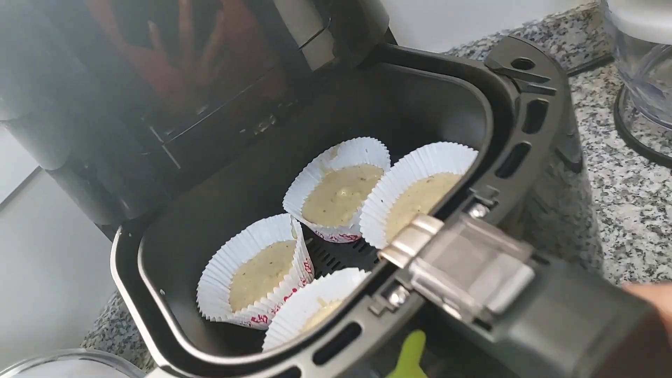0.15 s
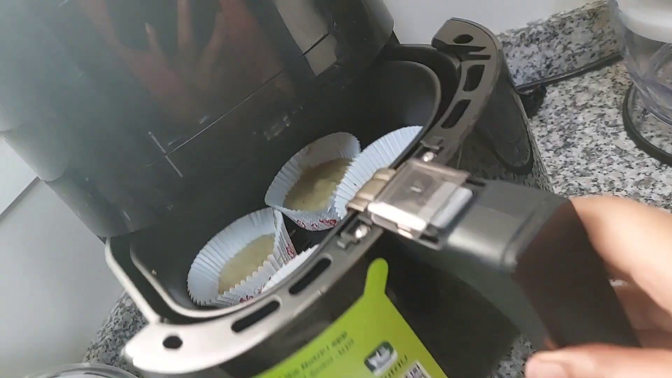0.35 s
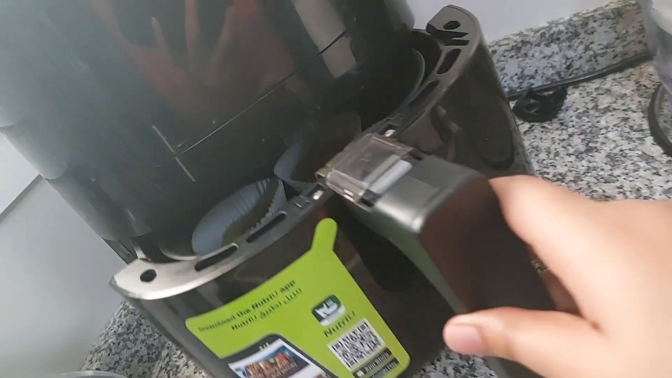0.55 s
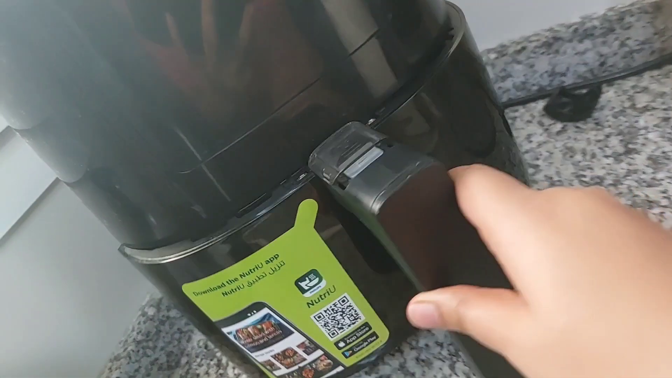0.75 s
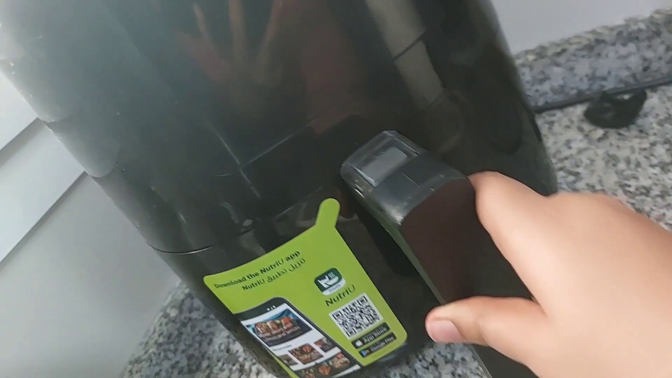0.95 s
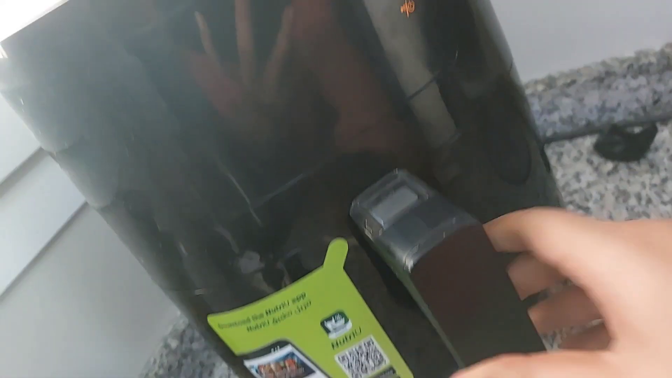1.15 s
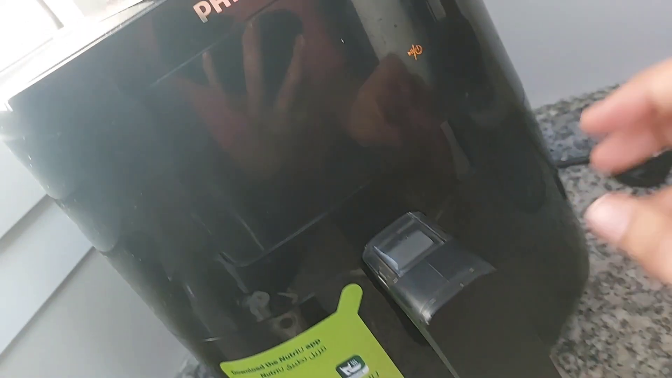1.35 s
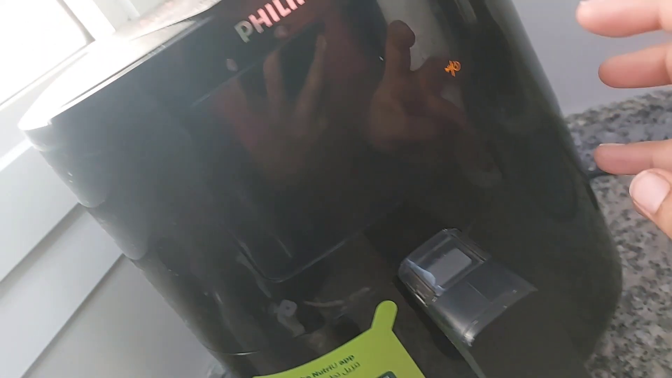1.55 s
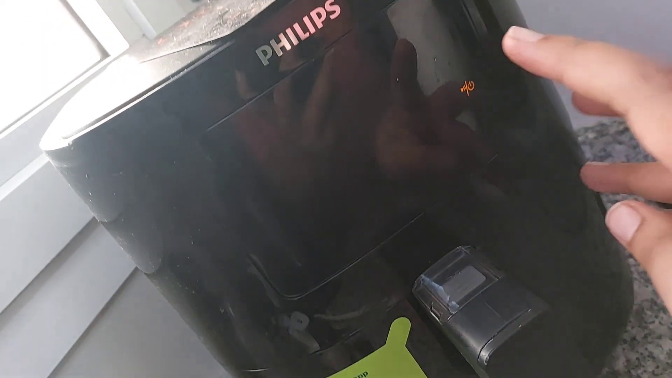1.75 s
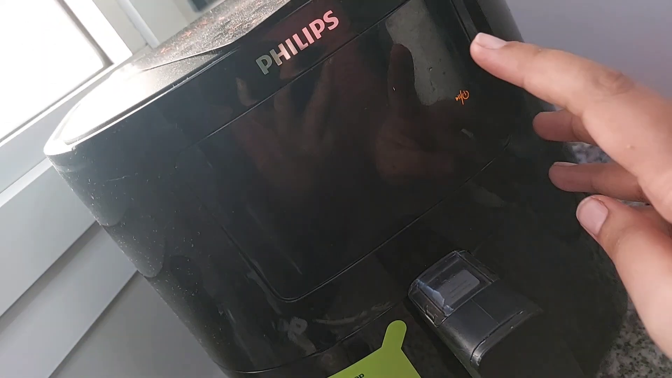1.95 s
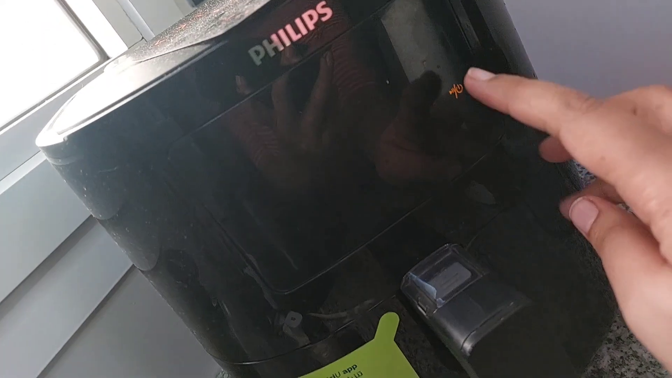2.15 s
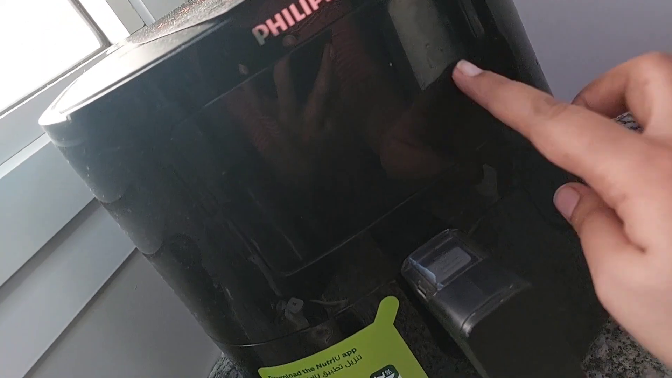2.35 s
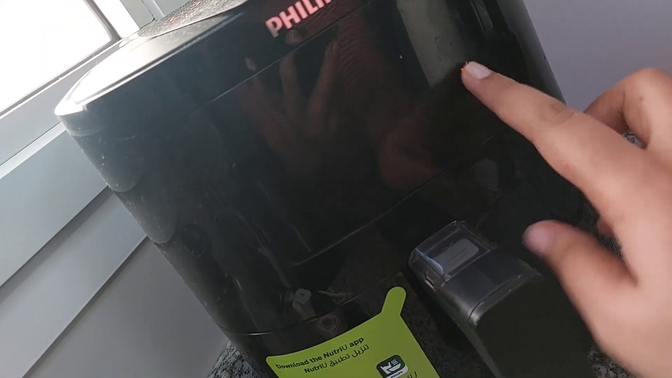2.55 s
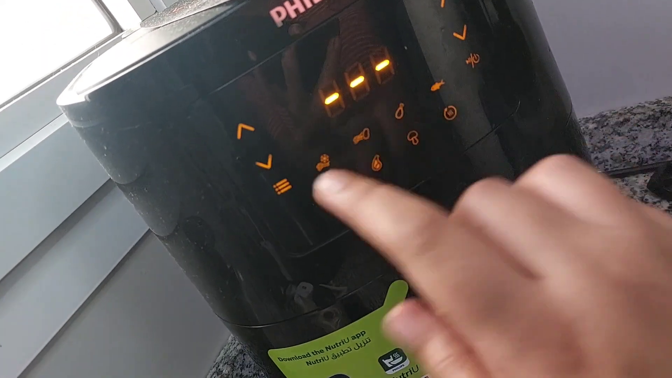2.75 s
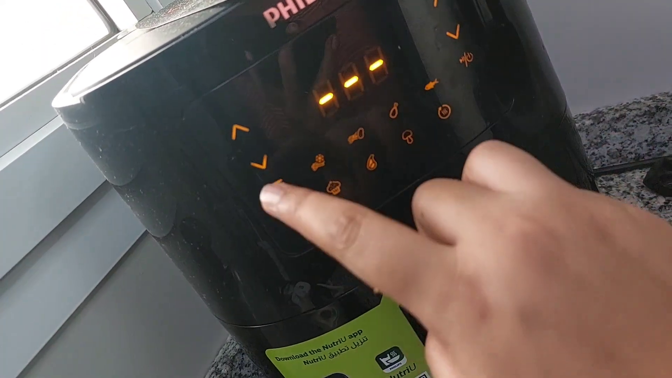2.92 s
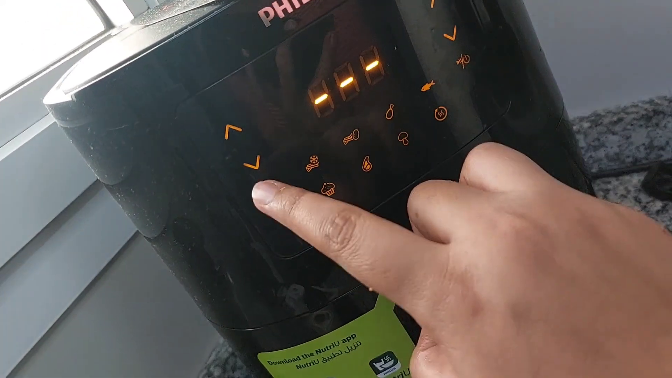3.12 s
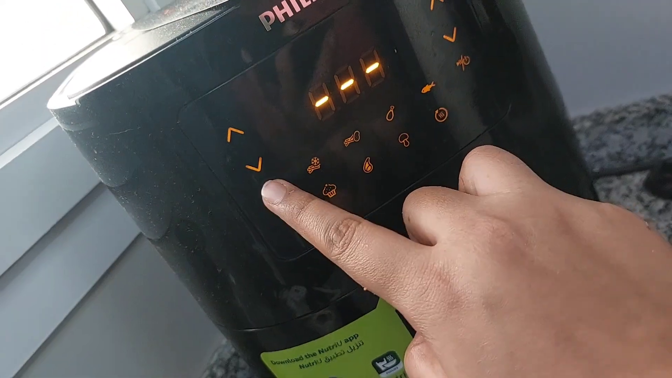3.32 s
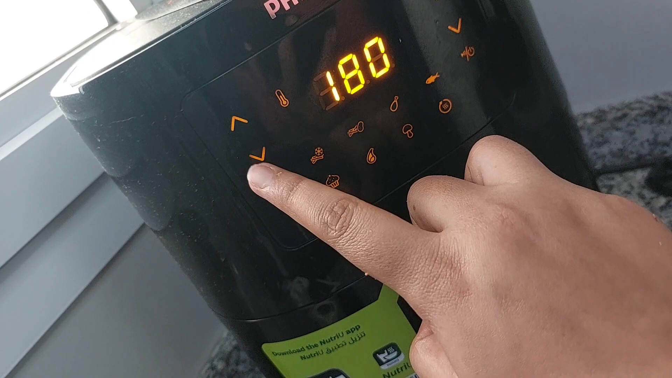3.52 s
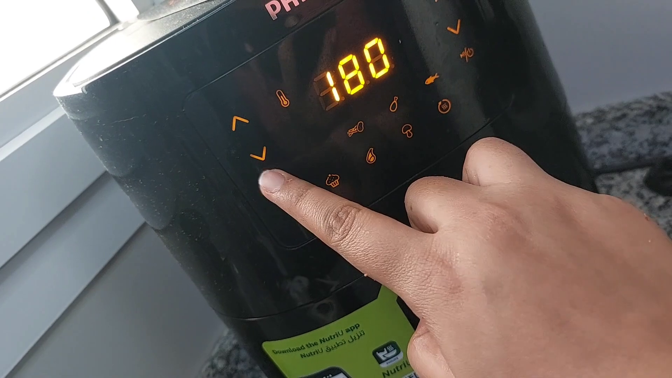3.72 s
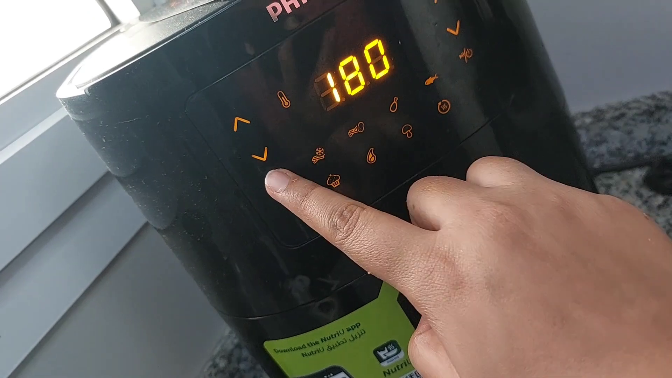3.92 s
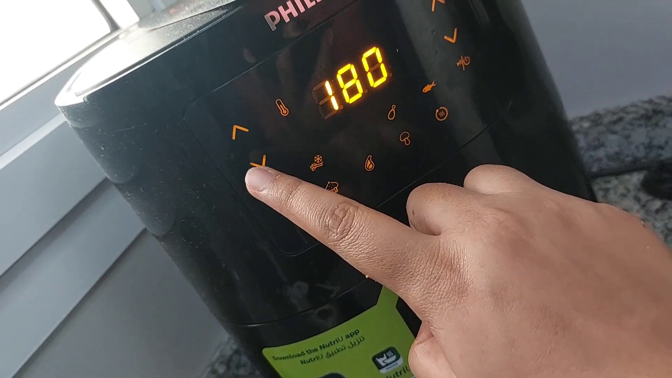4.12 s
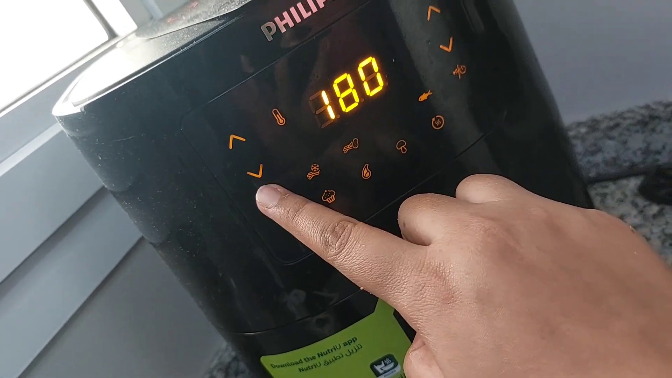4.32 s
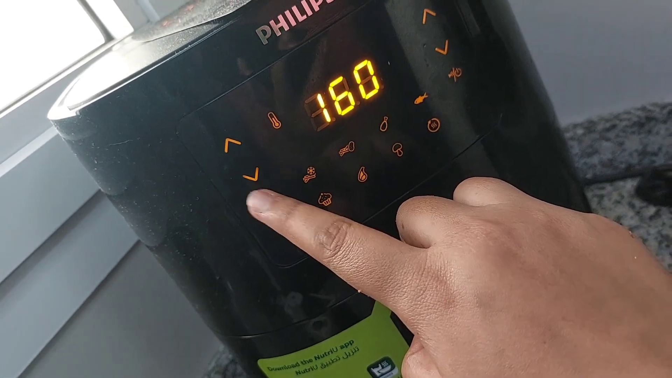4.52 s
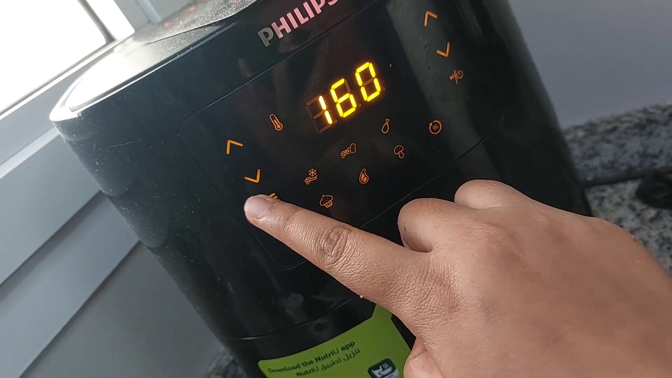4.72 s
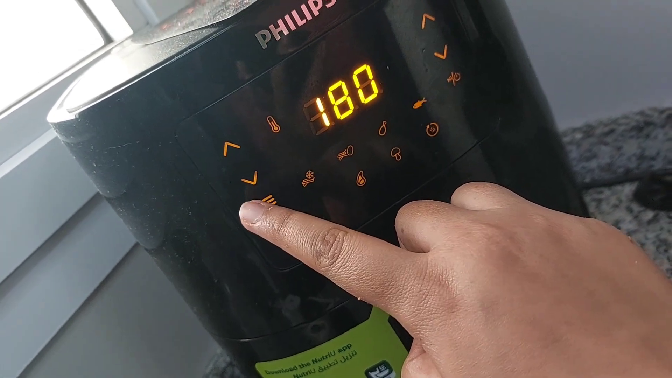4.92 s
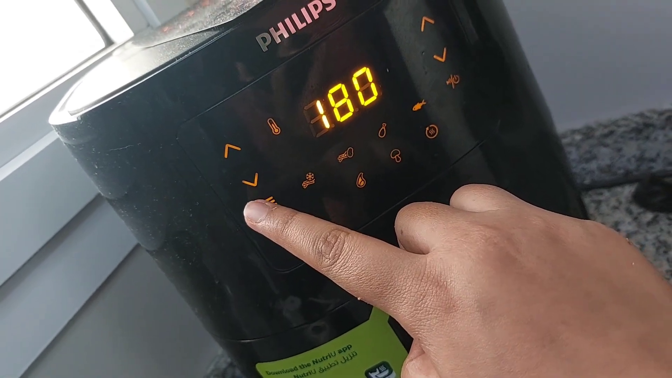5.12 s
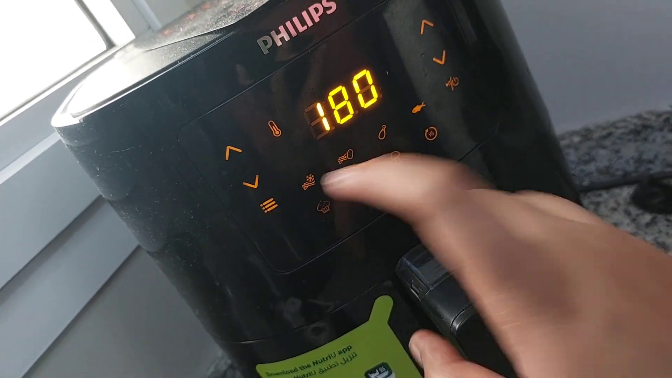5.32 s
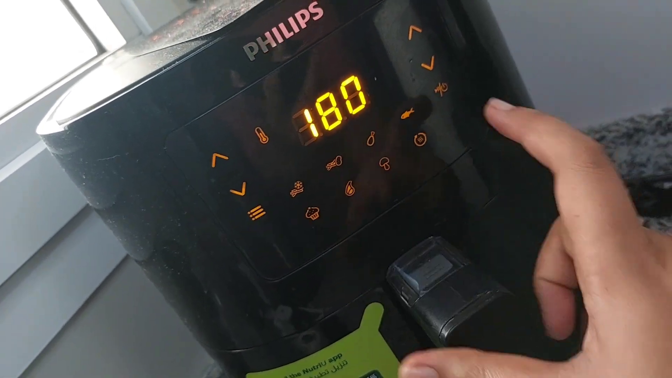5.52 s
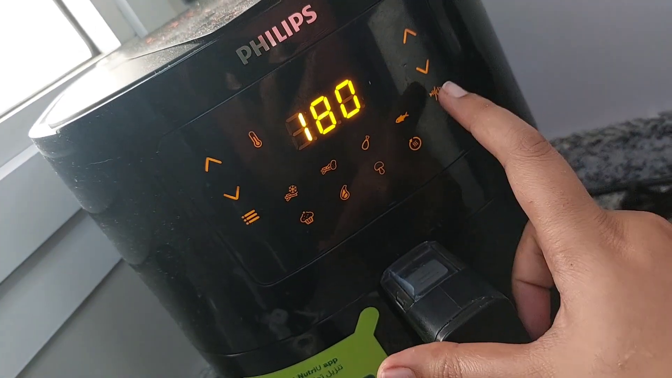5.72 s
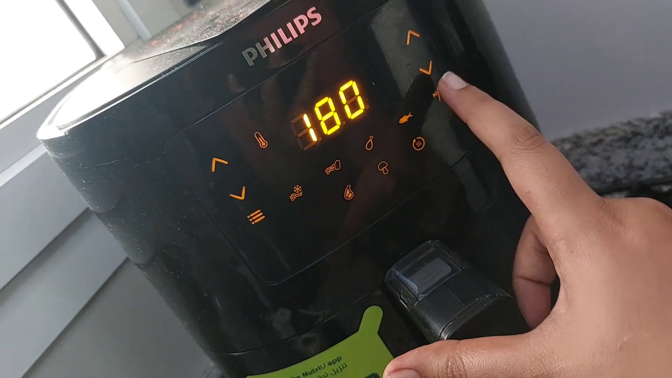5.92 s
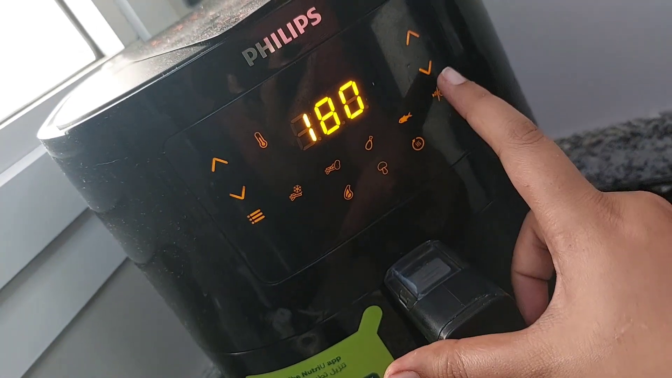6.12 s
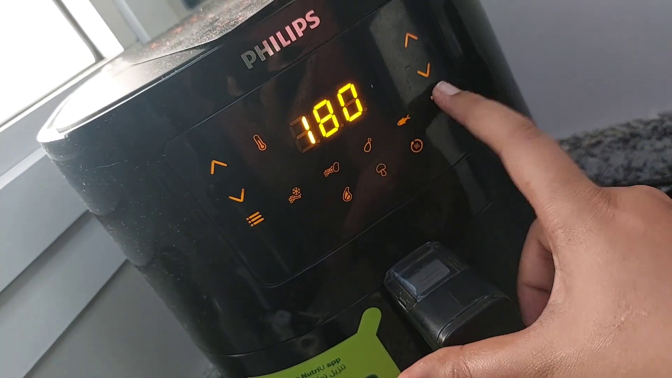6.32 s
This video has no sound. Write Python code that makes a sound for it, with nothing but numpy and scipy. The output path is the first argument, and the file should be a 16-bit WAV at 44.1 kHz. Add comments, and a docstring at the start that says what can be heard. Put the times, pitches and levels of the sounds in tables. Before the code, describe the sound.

Scraping, knocking appliance drawer bangs shut within the first second or so, leaving a wavering mains hum, small handling ticks and a very faint distant horn.

```python
"""Fryer drawer shutting in a kitchen

The basket drawer of a counter-top fryer slides in, knocks on its guides, rattles and latches shut: grains
of rubbing and short blows ring its modes, over hissing rails. A mains hum of wavering sines and a rumble of
banded noise lie below; later a hand ticks and rustles close to the microphone and a far two-tone horn sounds.
The recorder lowers its gain on the loud knocks, holds it and lets it come back."""
import sys
import numpy as np
from scipy import signal
from scipy.fft import rfft, irfft, next_fast_len
from scipy.io import wavfile

SR = 44100
rng = np.random.default_rng(int(sys.argv[2]) if len(sys.argv) > 2 else 0)


def dump(signal):
    """Clip the signal to [-1, 1] and save it as 16-bit WAV at the path in sys.argv[1]."""
    limited = np.clip(np.atleast_2d(signal).T, -1, 1)
    pcm = np.round(limited * 32767).astype(np.int16)
    wavfile.write(sys.argv[1], SR, pcm)


N = 280476  # samples
TOP_HZ = SR / 2.2  # highest band edge


def from_db(db):
    """Gain of a level in dB."""
    return 10 ** (np.asarray(db) / 20)


def rms_one(x):
    """Scaled to rms 1."""
    return x / np.sqrt(np.mean(x ** 2) + 1e-20)


def in_time(rows):
    """Curve columns in dB at every sample; silent outside the table."""
    s, *columns = np.transpose(rows)
    return [np.interp(np.arange(N) / SR, s, column, -200, -200) for column in columns]


def at_hz(points, hz):
    """A spectrum read on a log frequency axis."""
    table_hz, values = np.transpose(points)
    return np.interp(np.log(hz), np.log(table_hz), values)


def drift(rate):
    """Slow random wandering of rms 1: white noise through two equal poles at the rate in Hz."""
    step = 40  # samples between computed points
    r = np.exp(-2 * np.pi * rate * step / SR)
    white = rng.standard_normal(N // step + 2002)
    slow = signal.lfilter([1], [1, -2 * r, r * r], white)[2000:]  # settled part
    return np.interp(np.arange(N) / step, np.arange(len(slow)), rms_one(slow))


def ring(clicks, hz, t60):
    """A two-pole resonance: a unit click sets off a dying sine of height 1."""
    r, w = from_db(-60 / (t60 * SR)), 2 * np.pi * hz / SR
    return signal.lfilter([0, np.sin(w)], [1, -2 * r * np.cos(w), r * r], clicks + 1e-18)


def band(x, low_hz, high_hz):
    """Butterworth band-pass."""
    edges = [low_hz, min(high_hz, TOP_HZ)]
    return signal.sosfilt(signal.butter(2, edges, "band", fs=SR, output="sos"), x)


def burst(s, length, noise, size):
    """A contact: a click inside chatter that swells and dies away; energy 1."""
    t = np.arange(len(noise)) / SR
    force = noise * np.exp(-t / max(length, .0005)) * (1 - np.exp(-t / 0.0011))
    force[30] = 7.4  # the click
    at, out = round(s * SR), np.zeros(size)
    out[at:at + len(t)] = force / np.sqrt(np.sum(force ** 2))
    return out


ONSET_S = 0.0024  # time constant


def dying(s, db, t60, size):
    """Quick starts that die away exponentially: summed gain at every sample."""
    starts, r = np.zeros(size), np.exp(-1 / (ONSET_S * SR))
    starts[np.round(np.asarray(s) * SR).astype(int)] = from_db(db)
    decay = from_db(-60 / (t60 * SR))
    return signal.lfilter([1 - r], np.convolve([1, -r], [1, -decay]), starts + 1e-18)


def swell(s, db, length):
    """A bell-shaped rise and fall of gain, down to 1/e one length from its peak."""
    return from_db(db) * np.exp(-((np.arange(N) / SR - s) / length) ** 2)


# How alike noise reaches the left and right microphones.
# Each row: frequency in Hz, likeness from -1 (opposite) to 1 (same).
LIKENESS = [(60, 0.89), (180, 0.77), (550, -0.16), (1650, -0.22), (4970, -0.06), (15000, 0.24)]


def banded_noise(spectrum, patchy_db, size):
    """Half-octave bands of stereo noise, each with its own level, flicker and likeness; rms 1."""
    out, together = 0, drift(3)
    edges = 30 * 2 ** np.arange(0, 9.6, .5)
    white = rng.standard_normal((2, 2, size))
    for k, (low, high) in enumerate(zip(edges, edges[1:])):
        hz = np.sqrt(low * high)
        if hz < spectrum[0][0]:
            continue
        mid, side = band(white[k % 2], low, high)
        alike = np.clip(at_hz(LIKENESS, hz), -1, 1)
        flicker = (0.42 * together + drift(5.5))[:size]
        gain = from_db(at_hz(spectrum, hz) + patchy_db * flicker)
        out = out + gain * (np.sqrt(1 + alike) * mid + np.sqrt(1 - alike) * side * [[1], [-1]])
    return rms_one(out)


# Rumble of the kitchen around the microphone, its spectral shape.
# Each row: frequency in Hz, relative density in dB per Hz.
ROOM_TONE = [(18, -43), (30, -12), (48, -7), (69, -12.5), (86, -5.5), (103, -5), (156, -13.5), (244, -15),
             (271, -22), (301, -22), (523, -39), (775, -34), (1270, -50.5), (3190, -63.5), (15800, -65.5)]
ROOM_DB = -43.5


def room_tone():
    """Steady kitchen rumble: gently flickering noise with most of its power in the bass."""
    return from_db(ROOM_DB) * banded_noise(ROOM_TONE, patchy_db=1.5, size=N)


# The two lowest hum tones in the room swell and sink.
# Each row: time in seconds, first tone in dB rms, second tone in dB rms.
SWELL = [(0.0, -92, -58), (0.49, -40, -30), (1.219, -62.5, -41), (1.86, -48, -37.5), (2.0, -68, -41),
         (2.198, -63.5, -36), (2.499, -56, -41.5), (2.7, -51, -39.5), (3.629, -52.5, -41),
         (4.13, -47.5, -36.5), (4.36, -45, -43.5), (4.6, -53.5, -35.5), (4.94, -48.5, -43),
         (5.15, -44.5, -39.5), (5.3, -57, -42), (5.671, -48, -38), (6.04, -61.5, -39.5), (6.36, -52.5, -37)]
# Pitches of those two tones, in Hz.
SWELL_HZ = [50.7, 100.3]
# Fainter hum of motors and mains.
# Each row: frequency in Hz, level in dB rms, waver in dB.
HUM = [(130.2, -51, 2.5), (303, -68, 7.5), (353, -69, 2.5), (773, -72, 1.5), (868, -76.5, 3)]


def hum():
    """Sines that waver in level and a little in phase."""
    t = np.arange(N) / SR
    tones = [(hz, db, 1.5) for hz, db in zip(SWELL_HZ, in_time(SWELL))] + HUM
    out = 0
    for hz, db, waver_db in tones:
        gain = np.sqrt(2) * from_db(db + waver_db * drift(0.69))
        out = out + gain * np.sin(2 * np.pi * hz * t + .5 * drift(1.1))
    return out


# Blasts of a far car horn.
# Each row: start in seconds, length in seconds, level in dB.
HORN = [(4.374, 0.17, -73), (4.932, 0.083, -89)]
# Its two tones. Each row: pitch in Hz, level in dB.
HORN_HZ = [(407, -1.5), (487, 1.5)]
# What reaches the kitchen from the street. Each row: frequency in Hz, gain in dB.
HORN_PATH = [(400, -20), (800, 8), (1000, 9.5), (1500, 1), (2000, -1.5), (2500, -17.5), (3500, -29)]
HORN_ATTACK_S, HORN_ECHO_T60_S = 0.041, 0.8


def horn():
    """Harmonics 2 to 6 of two buzzing diaphragms, thinned by distance and the window, with an echo tail."""
    t = np.arange(N) / SR
    tones = 0
    for hz, db in HORN_HZ:
        for k in range(2, 7):
            gain = from_db(db + at_hz(HORN_PATH, k * hz) + 2.5 * drift(20))
            phase = 1.3 * drift(12) + rng.uniform(0, 2 * np.pi, (2, 1))  # each side starts at its own phase
            tones = tones + gain * np.sin(2 * np.pi * k * hz * t + phase)
    blasts = 0
    for s, length, db in HORN:
        attack = np.clip((t - s) / HORN_ATTACK_S, 0, 1)
        tail_db = -60 * np.maximum(t - s - length, 0) / HORN_ECHO_T60_S
        blasts = blasts + attack * from_db(db + tail_db)
    return blasts * tones


KITCHEN_T60_S, WALL_CUT_HZ = 0.41, 6000


def kitchen(x):
    """Eight feedback delays a side, duller on every round, evaluated as a frequency response."""
    size = next_fast_len(N + SR)
    turn = np.exp(-2j * np.pi * np.arange(size // 2 + 1) / size)  # a delay of one sample
    dull = np.exp(-2 * np.pi * WALL_CUT_HZ / SR)
    spectrum, out = rfft(x, size), np.zeros((2, size // 2 + 1), complex)
    for k, lag in enumerate((rng.uniform(.008, .03, 16) * SR).astype(int)):
        loss = from_db(-60 * lag / SR / KITCHEN_T60_S)
        loop = loss * (1 - dull) / (1 - dull * turn) * turn ** lag
        out[k % 2] += spectrum * loop / (1 - loop) * (-1) ** (k // 2)
    return irfft(out, size)[:, :N]


# A hand ticks close to the microphone.
# Each row: start in seconds, tick in dB, thud in dB, decay time constant in seconds,
# rustle left behind in dB, its t60 in seconds.
TICKS = [(2.5993, -30, -30.5, 0.012, -66.5, 0.73), (2.7105, -62.5, -30.5, 0.016, -69, 0.37),
         (2.7212, -30, -32, 0.086, -77, 0.35), (3.797, -31.5, -42, 0.028, -74, 0.34),
         (3.814, -27.5, -37, 0.014, -70, 0.29), (3.826, -52, -30.5, 0.021, -87, 0.25)]
# Sleeve and fingers brush past the microphone.
# Each row: time of the peak in seconds, peak gain in dB, length to 1/e in seconds.
RUSTLE = [(2.362, -83, 0.055), (2.932, -82.5, 0.072), (3.211, -81.5, 0.11), (3.6, -85.5, 0.089),
          (3.805, -56.5, 0.0066), (4.11, -74, 0.096), (4.45, -76, 0.24), (4.753, -85, 0.16),
          (5.339, -77, 0.14), (6.142, -81, 0.044)]
RUSTLE_FLOOR_DB = -88
MIC_PEAK_HZ, MIC_PEAK_T60_S = 5200, 0.0063


def hand():
    """Contacts heard as bright ticks and dull resonant thuds, and a faint rustle of high noise."""
    out = np.zeros((2, N))
    rustle = from_db(RUSTLE_FLOOR_DB) + sum(swell(*row) for row in RUSTLE)
    for s, tick_db, thud_db, length, tail_db, tail_t60 in TICKS:
        force = np.array([burst(s, length, rng.standard_normal(3000), size=N) for side in range(2)])
        thud = ring(force[0], 296, 0.019) + ring(force[1], 231, 0.012) + 0.39 * ring(force, 364, 0.022)
        out += from_db(tick_db) * band(force, 1700, 19000) + from_db(thud_db) * thud
        rustle = rustle + dying(s, tail_db, tail_t60, size=N)
    fabric = rms_one(band(rng.standard_normal((2, N)), 3200, TOP_HZ))
    out += rustle * from_db(1.5 * drift(30)) * fabric
    return out + from_db(-23) * ring(out, MIC_PEAK_HZ, MIC_PEAK_T60_S)  # the microphone ports ring a little


# Hiss of the rails under the drawer, its spectral shape.
# Each row: frequency in Hz, relative density in dB per Hz.
RAILS = [(600, -2.5), (900, 2.5), (1200, -8), (1640, -1.5), (2450, -10.5), (3420, -7.5), (5150, -11.5),
         (6500, -14), (9000, -17), (13000, -17.5), (17000, -21.5)]
SPLASH_DB, SPLASH_T60_S = -20.5, 0.12  # re crack


def rails(hiss_db, s, crack_db):
    """Sliding noise; each crack also shakes a dying hiss out of the rails."""
    size = len(hiss_db)
    splash = dying(s, crack_db + SPLASH_DB, SPLASH_T60_S, size=size)
    return (from_db(hiss_db) + splash) * banded_noise(RAILS, patchy_db=1.5, size=size)


# Overtones of the groaning pan. Each row: multiple of its pitch, level in dB.
PAN_OVERTONES = [(1, 0), (2, -12), (3, -10), (4, -10)]
# One rise of the groan: time of the peak in seconds, gain in dB, length to 1/e in seconds.
GROAN_SWELL = (0.265, -31, 0.035)
GROAN_DB = -47  # steady until the first knock
PAN_HZ, PAN_T60_S = 409, .15


def pan(grains, first_knock):
    """The grains of rubbing set harmonic resonances groaning."""
    size = len(grains)
    before_knock = np.arange(size) / SR < first_knock
    groan = from_db(GROAN_DB) * before_knock + swell(*GROAN_SWELL)[:size]
    return groan * sum(from_db(db) * rms_one(ring(grains, k * PAN_HZ, PAN_T60_S)) for k, db in PAN_OVERTONES)


CLATTER_DB, CLATTER_T60_S = -23, 0.25  # re knock level


def clatter(s, peak, grains):
    """The many short plastic modes between those listed: dying band noise after each knock."""
    size = len(grains)
    noise = band(grains + rng.standard_normal((2, size)), 298, 1500)
    return dying(s, peak + CLATTER_DB, CLATTER_T60_S, size=size) * rms_one(noise)


BASKET_HZ, BASKET_T60_S, BASKET_WAVER_DB = 522, 0.53, 0.5
BASKET_STOP_S, BASKET_STOP_T60_S = 0.85, 0.08  # a knock seats the basket and chokes its ring


def basket(s, db, size):
    """One metal mode struck by every knock; rings begun before the basket is seated are choked."""
    t = np.arange(size) / SR
    early, late = np.zeros((2, size))
    for at, level in zip(s, db):
        clicks = early if at < BASKET_STOP_S else late
        clicks[round(at * SR)] = from_db(level)
    choke = from_db(-60 * np.maximum(t - BASKET_STOP_S, 0) / BASKET_STOP_T60_S)
    rings = choke * ring(early, BASKET_HZ, BASKET_T60_S) + ring(late, BASKET_HZ, BASKET_T60_S)
    return from_db(BASKET_WAVER_DB * drift(15)[:size]) * rings


# Modes of the drawer body.
# Each row: frequency in Hz, level in dB, t60 in seconds.
BODY = [(128.2, -5.5, 0.18), (158, -8, .12), (194, -7, 0.075), (223, -11, 0.21), (248, -6, 0.086),
        (343, -5, 0.059), (342, -7.5, .07), (403, -7.5, 0.1), (447, -8, 0.037), (485.4, -8.5, 0.07),
        (553, -13.5, 0.14), (590, -7, 0.048), (620.8, -9.5, 0.12), (715, -12.5, 0.08), (774, -15.5, 0.15),
        (760, -14.5, .06), (876, -17, 0.095), (951.7, -12, 0.038), (1039, -10.5, 0.038), (1097, -9.5, 0.02),
        (1158.6, -11.5, 0.052), (1290, -17, 0.017), (1480, -21, 0.04), (1632, -18.5, 0.15),
        (1910, -10, 0.018), (2190, -8.5, 0.014), (2660, -14, 0.016), (3250, -8, 0.011),
        (3900, -4.5, 0.0081), (5100, -9.5, 0.0043), (7182, -8.5, 0.0072), (11300, -12.5, 0.0046),
        (14176, -14.5, .004)]


def drawer_body(forces, knocks, grains, rub_db, rumble_db):
    """Knocks and rubbing drive the same damped modes; higher ones reach the sides out of step."""
    s, peak, thud, crack, _, thud_hz, tilt = knocks
    size = len(grains)
    out = np.zeros((2, N))
    for k, (hz, level_db, t60) in enumerate(BODY):
        low = np.interp(np.log(hz), np.log([240, 380]), [1, 0])
        high = np.interp(np.log(hz), np.log([1200, 2000]), [0, 1])
        near_thud = thud - 12 * np.log2(hz / thud_hz) ** 2  # knocks favour low modes near their own pitch
        cracks = crack + tilt * np.log2(hz / 3000)
        blow_db = peak + low * near_thud + high * cracks + rng.normal(0, 1.5, len(s))
        blows = from_db(blow_db) @ forces
        rub = grains * from_db(low * rumble_db + (1 - low) * rub_db - 13.5 - 10 * high)
        mode = (-1) ** k * from_db(level_db) * ring(blows + rub, hz, t60)
        lag = int(rng.uniform(0, np.clip(hz / 700, 0, 1) ** 2) * SR / hz)  # right side, up to one period
        out[0, :size] += mode
        out[1, lag:size + lag] += mode
    return out


# The slide of the drawer.
# Each row: time in seconds, drive of the rubbing body in dB, hiss of the rails in dB.
SLIDE = [(0.0, -54, -51), (0.19, -39.5, -38), (0.268, -40, -32), (0.314, -41, -40), (0.424, -38.5, -34),
         (0.53, -34, -36.5), (0.654, -39, -30), (0.712, -38.5, -36), (0.786, -33.5, -44),
         (0.88, -32.5, -39.5), (0.982, -44, -41), (1.098, -52.5, -56.5), (1.314, -77, -66.5),
         (1.5, -93.5, -78)]
# Knocks on the guides, up to the latch.
# Each row: start in seconds, drive level in dB, then in dB re that level the thud, the crack and
# the basket ring, thud pitch in Hz, crack tilt in dB per octave.
KNOCKS = [(0.337, 5.5, 0.5, -8, -35, 246, -3), (0.365, -1, -6.5, -12.5, -30, 235, -5.5),
          (0.438, -4, -5.5, -13, -28.5, 239.4, -4.5), (.467, 2, -6.5, -10, -30.5, 271.4, -3),
          (.485, -8, -3, -15, -2, 129.8, -17.5), (.503, -17.5, 7.5, -16.5, -17, 218.2, -1.5),
          (0.605, -13.5, 0.5, -3, -21.5, 241.2, -6.5), (0.654, -17, -3, -1, -27.5, 300, -4),
          (0.731, -12.5, 6, -3.5, -25, 225, -12.5), (0.743, -3.5, 3.5, -12, -22, 190, -5),
          (0.762, -12.5, 1, -13.5, -29.5, 205, -2), (0.78, -20.5, 3.5, -14.5, -23.5, 200, -2),
          (0.797, -23, -0.5, 7, -27.5, 210.8, 1.5), (.808, -14.5, 14.5, 8.5, -27.5, 191.7, -7),
          (.854, -2.5, 1, -5.5, -31, 163.4, 7.7), (0.861, 2.5, 8, -14.5, -16.5, 166.1, -5),
          (0.881, -36, 20, -23.5, -26, 200.4, -0.5), (0.896, -24, 17, -26, -5.5, 130.9, -1),
          (.974, -23.5, -23, -13, -43, 132, -13), (1.104, -25.5, -7, 0, -20, 202, -10.5),
          (1.148, -57, -5, -4, -27, 197, -10), (1.195, -42, 7, 2.5, -24, 201, -5),
          (1.294, -61, -6, 12.5, -26, 200, -2)]
RUMBLE_DB, RUMBLE_GROWS_DB_PER_S = -9, 12  # low modes re rubbing: at the start, and as it enters the cavity
CHATTER_S, CHATTER_HALVES_S = 0.017, 0.45  # chatter shortens as the drawer is held more tightly
GRAINS_PER_S = 1500


def drawer():
    """Random grains of rubbing and chattering blows excite body, basket, pan and rails for two seconds."""
    span = 2 * SR
    t = np.arange(span) / SR
    rub_db, hiss_db = [column[:span] for column in in_time(SLIDE)]
    rumble_db = rub_db + RUMBLE_DB + RUMBLE_GROWS_DB_PER_S * t
    knocks = np.transpose(KNOCKS)
    s, peak, _, crack, basket_db, _, tilt = knocks
    lengths = CHATTER_S * .5 ** ((s - s[0]) / CHATTER_HALVES_S)
    forces = np.array([burst(at, length, rng.standard_normal(3000), size=span)
                       for at, length in zip(s, lengths)])
    is_grain = rng.random(span) < GRAINS_PER_S / SR
    grain_db = np.minimum(rng.exponential(1, span), 4)
    grains = rms_one(is_grain * from_db(grain_db) * rng.choice([-1, 1], span))
    out, hiss = drawer_body(forces, knocks, grains, rub_db, rumble_db), np.zeros((2, N))
    out[:, :span] += basket(s, peak + basket_db, span)
    out[:, :span] += clatter(s, peak, grains)
    out[:, :span] += pan(grains, s[0])
    hiss[:, :span] = rails(hiss_db, s, peak + crack + tilt)  # the crack an octave above 3 kHz
    return band(out, 120, TOP_HZ), hiss  # a small body radiates little deep bass


WET_DB = -18
LEFT_DB = -1.3  # left re right


def scene():
    """Drawer and hand in the kitchen, over hum, room tone and horn."""
    body, hiss = drawer()
    near = body + hand()
    floor = hum() + room_tone()
    echo = from_db(WET_DB) * kitchen(band(near[0], 240, 16000))
    sound = near + echo + hiss + floor + horn()
    return sound * from_db([[LEFT_DB / 2], [-LEFT_DB / 2]])


MIC_LOW_HZ, CUTOFF_HZ = 44.3, 15800
LOUD_DB, DUCK_DB, HOLD_S, RECOVER_S = -10.5, -6, 1, 0.39


def record(dry):
    """The microphone drops deep bass; gain ducks on loud peaks, holds, recovers; peaks soften, top is cut."""
    t = np.arange(N) / SR
    dry = signal.sosfilt(signal.butter(4, MIC_LOW_HZ, "high", fs=SR, output="sos"), dry)
    loud = np.abs(dry).max(axis=0) > from_db(LOUD_DB)
    last_loud = np.maximum.accumulate(np.where(loud, t, -10))
    duck = np.clip(1 - (t - last_loud - HOLD_S) / RECOVER_S, 0, 1)
    duck = signal.lfilter([.002], [1, -.998], duck)  # the gain moves smoothly
    fade_in = np.clip(t / 0.027, 0, 1)
    wet = np.tanh(dry * from_db(DUCK_DB * duck) * fade_in)
    return signal.sosfilt(signal.ellip(10, .5, 70, CUTOFF_HZ, fs=SR, output="sos"), wet)


dry = scene()
out = record(dry)
dump(out)
```